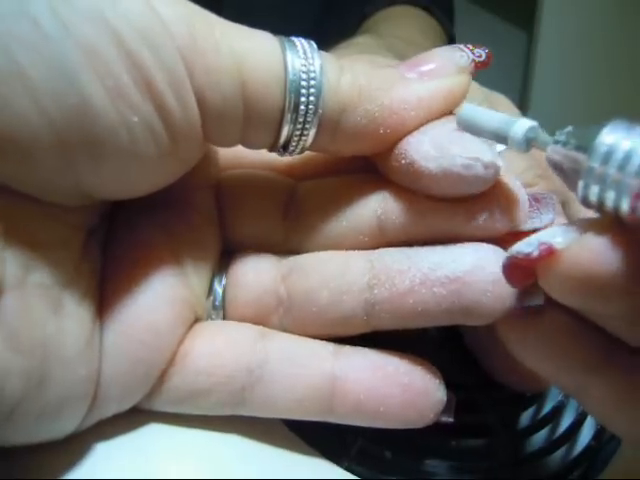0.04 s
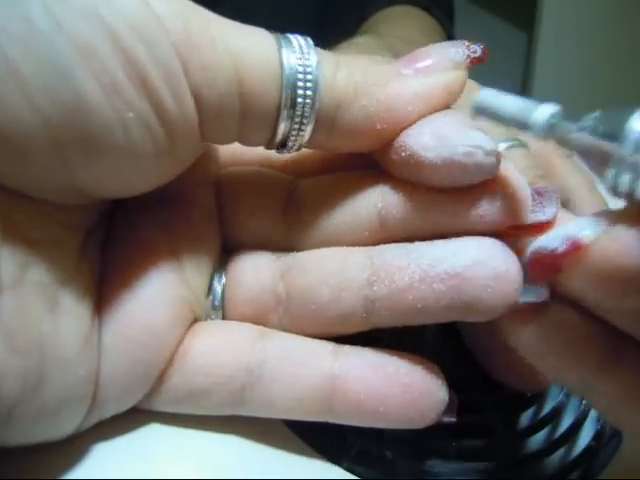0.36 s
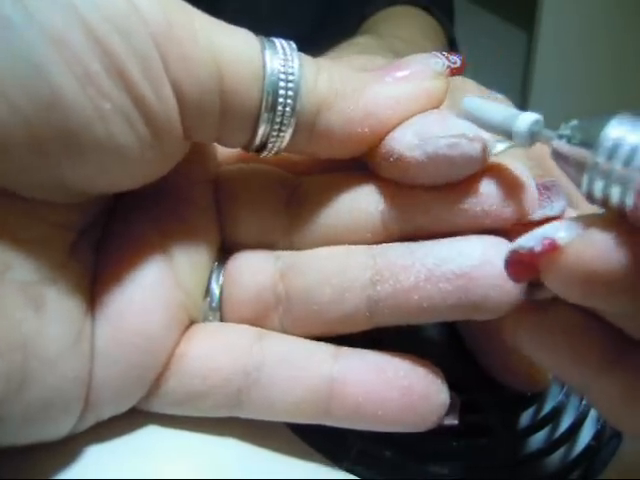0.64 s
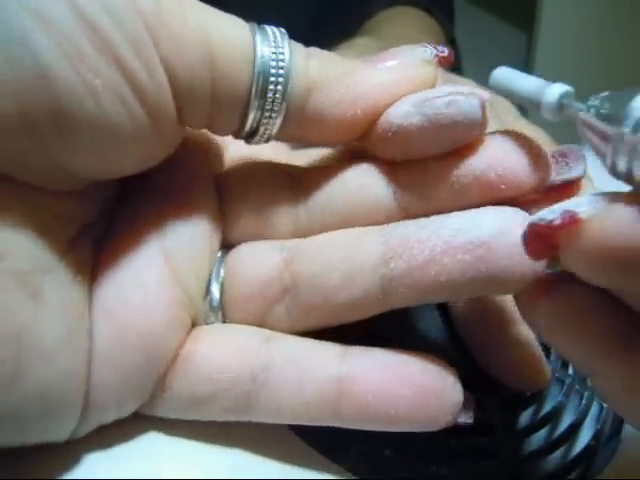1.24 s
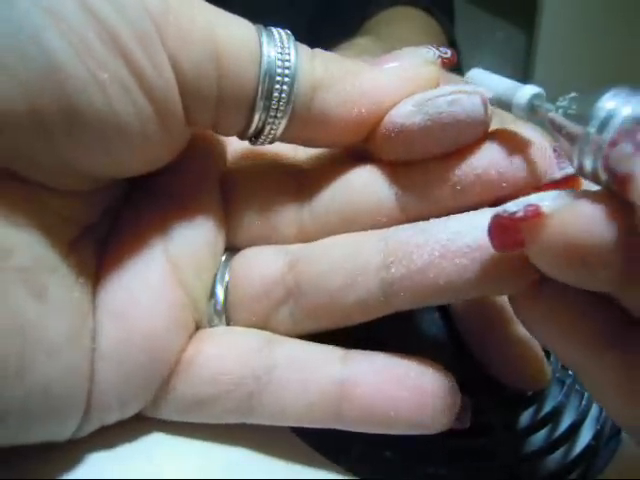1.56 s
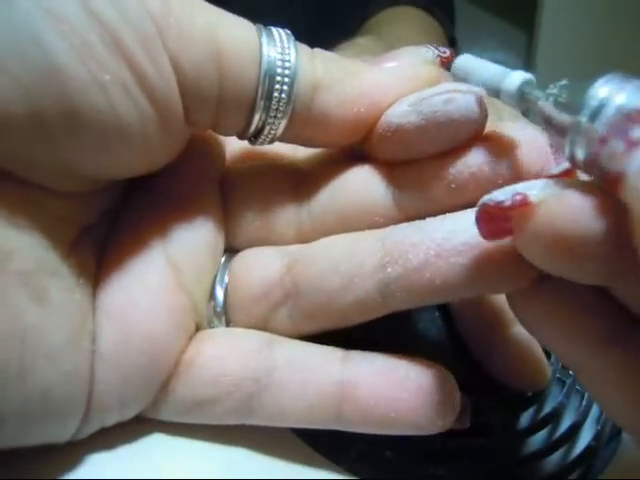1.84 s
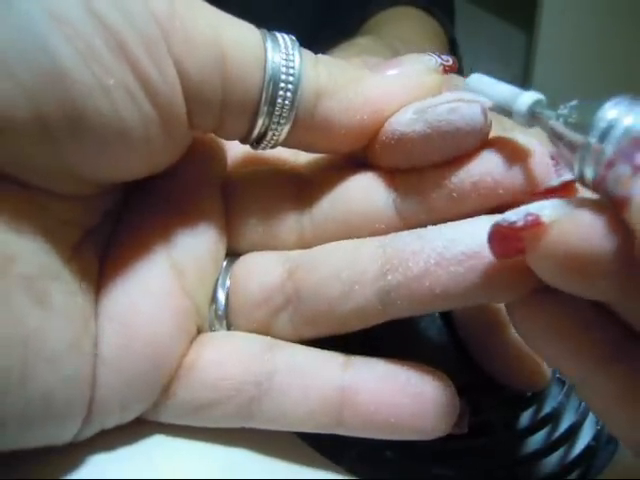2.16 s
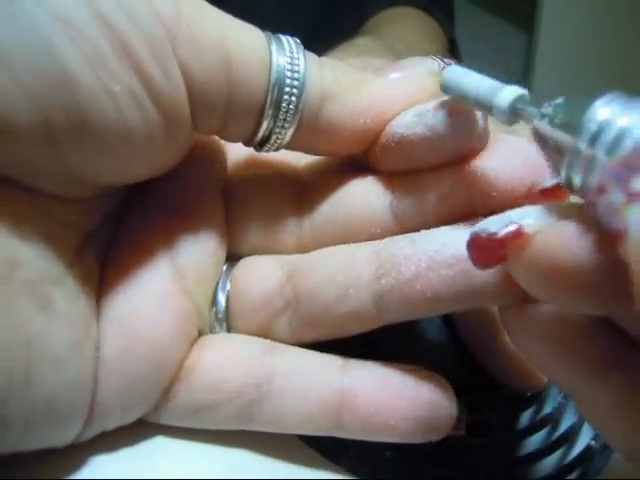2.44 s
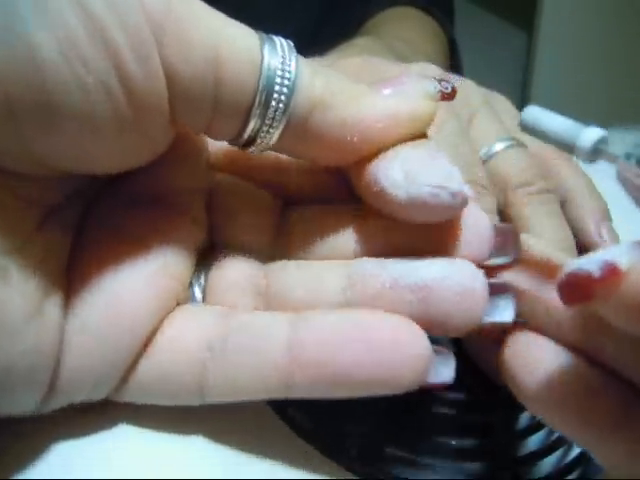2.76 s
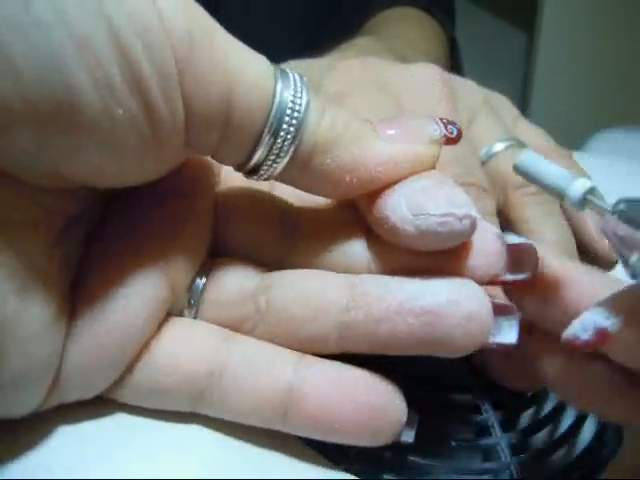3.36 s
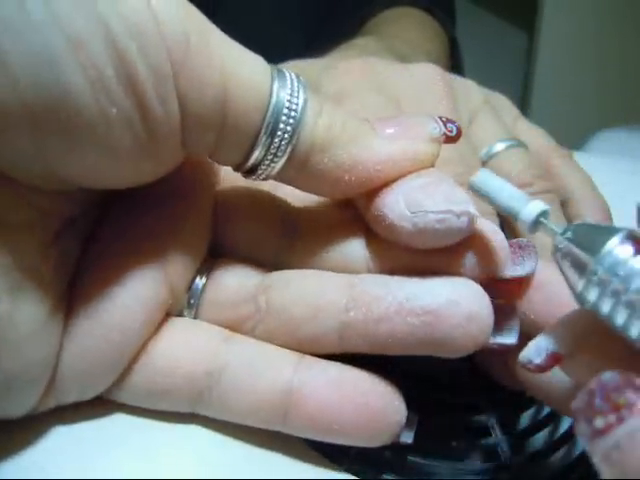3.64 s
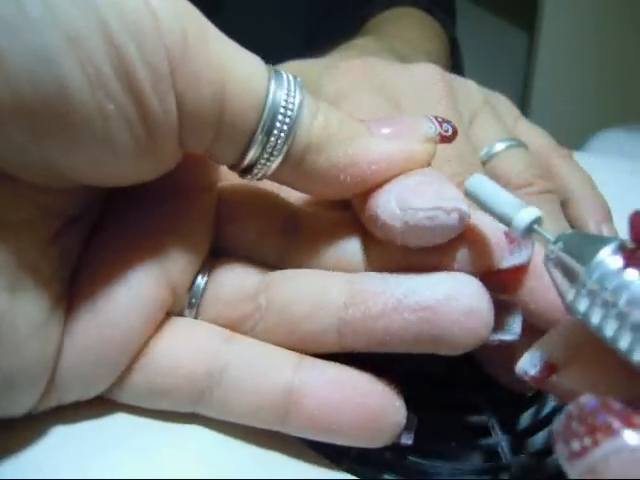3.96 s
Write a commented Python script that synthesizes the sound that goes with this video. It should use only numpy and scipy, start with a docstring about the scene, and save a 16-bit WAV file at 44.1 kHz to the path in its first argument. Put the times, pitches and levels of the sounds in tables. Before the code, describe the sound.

An electric nail file grinds a fingernail in four short strokes over a humming fan.

```python
"""Four short, rasping strokes of an electric nail file on a fingernail, close by, over a humming fan.
The bit bites once or twice a turn and drags the motor down; lifted off, the motor whirs back up to speed.
The dust extractor fan runs under the hands and grows louder as they move off it.
The camera's low sample rate mirrors the treble upwards."""
import sys
import numpy as np
from scipy.fft import rfft, irfft, next_fast_len
from scipy.io import wavfile
from scipy.ndimage import map_coordinates

SR = 44100
rng = np.random.default_rng(int(sys.argv[2]) if len(sys.argv) > 2 else 0)


def wrap_up_sound(samples):
    """Save the sound to the file named by the first command line argument, as 16-bit audio."""
    columns = np.atleast_2d(samples).T
    # keep every value between -1 and 1, then stretch to whole-number steps
    tamed = np.clip(columns, -1, 1)
    steps = np.round(tamed * 32767).astype(np.int16)
    wavfile.write(sys.argv[1], SR, steps)


N = 176400

FREE_SHAFT_HZ = 124.4
# one table per stroke (time [s], shaft speed [Hz], relative bite [dB], scrape [dB], knock [dB])
NAIL_STROKES = ([(0, 115.5, -22.5, -26, -23), (0.04, 113.7, -22.5, -25, -27),
                (0.1, 109.2, -19.5, -25.5, -31), (0.16, 104.6, -26, -31, -31),
                (0.21, 102.2, -21.5, -29.5, -30), (0.28, 98.7, -26, -32, -29),
                (0.36, 89.9, -24, -29.5, -31), (0.415, 88.25, -27, -33, -27)], [(0.64, 120, -45, -39, -23),
                (0.7, 119.6, -30, -27.5, -33), (0.77, 117.9, -26.5, -26.5, -44),
                (0.85, 107.9, -23, -27, -31), (0.89, 104.4, -24, -28, -31), (0.94, 98.3, -29, -23, -25),
                (0.98, 94.8, -22.5, -33, -26), (1.03, 92.1, -30, -32, -22.5),
                (1.07, 93.75, -22.5, -35, -34)], [(1.53, 124, -38, -31.5, -24),
                (1.59, 120.8, -29, -29.5, -27), (1.63, 118.7, -19.5, -26.5, -32),
                (1.67, 110.7, -24, -24.5, -19), (1.715, 102.3, -43, -26.5, -17.5),
                (1.77, 91.8, -40, -28, -22.5), (1.82, 91.3, -35, -28, -26), (1.88, 87.8, -33, -26.5, -49),
                (1.975, 91.6, -30, -30.5, -47)], [(2.205, 120.2, -34, -28, -27), (2.24, 116, -21, -29, -38),
                (2.275, 113.9, -16, -28.5, -34), (2.31, 107.9, -25, -26.5, -34),
                (2.36, 98.6, -24, -29.5, -24), (2.42, 87.8, -29, -28.5, -29), (2.46, 81.22, -32, -30, -26),
                (2.5, 83, -22, -30.5, -26), (2.545, 86.8, -27, -31, -49)])
# grit on nail (frequency [Hz], relative level [dB])
SCRAPE_SPECTRUM = [(500, -17), (1500, -7), (2300, 2), (3000, -7), (4000, -2.5), (5200, -1.5), (6500, 3.5),
                   (7300, 3), (8100, 8.5), (9300, 2), (10500, 1.5), (12000, -6)]


def grinding(turns, shaft_hz):
    """The bit's high spot bites and knocks the nail each turn, then rebounds; grit scrapes and sings."""
    # bite and knocked nail (frequency [Hz], relative level [dB])
    bite_spectrum = [(1000, -15), (3000, -25.5), (6000, -11), (7300, -14), (8100, 0), (8700, 4), (9300, -2),
                     (9900, 3), (10600, -5.5), (12000, -30)]
    nail_spectrum = [(400, -10), (1000, -21), (1500, -7), (1950, -3.5), (2300, 3), (2850, -7.5), (3700, -4),
                     (6000, -13), (10000, -4)]
    hard_bite_db, rebound_lag_turns = -20, .42
    sing_order, sing_peak_hz, sing_range_hz = 41.7, 105, 12
    bite_gain, scrape_gain, knock_gain = contact()
    bites = blows(turns, shaft_hz, decay_s=.0006, scatter_db=1.2)
    rebounds = blows(turns - rebound_lag_turns, shaft_hz, decay_s=.0006, scatter_db=1.2)
    rebound_gain = amp(-7) * np.minimum(bite_gain / amp(hard_bite_db), 1) ** .8
    grit = unit(bursts(turns, shaft_hz, decay_s=.027) * amp(1.7 * wobble(1500)))
    sing = unit(low_pass(noise(), hz=170, order=2) * np.sin(2 * np.pi * sing_order * turns))
    sing *= np.exp(-((shaft_hz - sing_peak_hz) / sing_range_hz) ** 2 / 2)
    knocks = blows(turns, shaft_hz, decay_s=.0009, scatter_db=1.8)
    return (amp(-2) * coloured(bite_gain * (bites + rebound_gain * rebounds), bite_spectrum)
            + amp(3) * coloured(scrape_gain * grit, SCRAPE_SPECTRUM)
            + amp(-10) * scrape_gain * sing
            + amp(-1) * coloured(knock_gain * knocks, nail_spectrum))


def contact():
    """Gains of bite, scrape and knock while the bit is on the nail."""
    press_s, lift_s = .0052, .024
    t, gains = clock(), np.zeros((3, N))
    for stroke in NAIL_STROKES:
        times_s, _, *levels_db = np.transpose(stroke)
        press = np.clip(1 + (t - times_s[0]) / press_s, 0, 1)
        lift = np.clip(1 - (t - times_s[-1]) / lift_s, 0, 1)
        gains += press * lift * amp([np.interp(t, times_s, db) for db in levels_db])
    return gains


def blows(turns, shaft_hz, decay_s, scatter_db):
    """One blow of random strength per turn: click and gritty tail at equal power."""
    count = np.floor(turns).astype(int)
    clicks = unit(np.diff(count, prepend=count[0]).astype(float))
    strengths = amp(scatter_db * np.clip(rng.standard_normal(1000), -2, 2))
    return unit(strengths[count] * (clicks + bursts(turns, shaft_hz, decay_s)))


def bursts(turns, shaft_hz, decay_s):
    """One burst of grit noise per turn."""
    age_s = (turns % 1) / shaft_hz
    return unit(noise() * np.exp(-age_s / decay_s))


def catches(decay_s):
    """Single harder ticks where the bit catches the nail's edge."""
    # ticks (time [s], level [dB])
    ticks = [(.645, -10), (0.662, -9), (1.5358, -10.5), (1.7699, -21), (2.4113, -12), (2.4217, -11)]
    t = clock()
    envelope = sum(amp(db) * (t >= s) * np.exp(-np.abs(t - s) / decay_s) for s, db in ticks)
    return coloured(envelope * noise(), SCRAPE_SPECTRUM)


def shaft_speed(spin_up_s):
    """Shaft speed in Hz: dragged down by the nail, recovering after each stroke."""
    t, shaft_hz = clock(), np.full(N, FREE_SHAFT_HZ)
    for stroke in NAIL_STROKES:
        times_s, hz = np.transpose(stroke)[:2]
        lifted_s = np.maximum(t - times_s[-1], 0)
        recovery_hz = FREE_SHAFT_HZ + (hz[-1] - FREE_SHAFT_HZ) * np.exp(-lifted_s / spin_up_s)
        stroke_hz = np.where(t < times_s[-1], np.interp(t, times_s, hz), recovery_hz)
        shaft_hz = np.where(t < times_s[0], shaft_hz, stroke_hz)
    return shaft_hz


def motor(turns, shaft_hz):
    """Brushes run over the same rough track inside the housing, hissing in two surges a turn."""
    # whir as the handpiece is moved about (time [s], level at free speed [dB])
    whir_levels = [(0, -35), (.55, -30), (1.15, -30), (1.5, -25), (2.05, -29), (2.65, -31.5), (2.9, -27),
                   (3.25, -25.5), (3.45, -25), (4, -24.5)]
    # housing response (frequency [Hz], relative level [dB])
    housing_spectrum = [(300, -19.5), (900, 0.5), (1500, 2), (2300, 0.5), (2700, -1.5), (3200, -0.5),
                        (4300, -5.5), (5200, -2), (6000, 3.5), (7000, 0.5), (8300, 4), (9200, 2.5),
                        (10100, 8.5), (10700, 1)]
    db_per_octave = 9
    harmonics = np.zeros(2049, complex)
    harmonics[1:90] = np.exp(2j * np.pi * rng.random(89))
    track = irfft(harmonics)
    buzz = unit(np.interp(turns % 1, np.arange(len(track)) / len(track), track))
    surge_db = 4 * np.cos(2 * np.pi * 2 * turns) + .64 * np.cos(2 * np.pi * turns) + .27 * wobble(200)
    hiss = amp(2.5) * noise()
    whir = unit(coloured(amp(surge_db) * (buzz + hiss), housing_spectrum))
    return whir * amp(curve(whir_levels) + db_per_octave * np.log2(shaft_hz / FREE_SHAFT_HZ))


def fan():
    """Extractor fan: air rush fluttering with the rotor, blade tones and mains hum."""
    # air rush (time [s], relative level [dB])
    air_levels = [(0.0, -33), (0.38, -35.5), (0.93, -32.5), (1.02, -34.5), (1.69, -32.5), (2.04, -36),
                  (2.19, -33.5), (2.58, -35.5), (3.69, -27), (4.0, -27)]
    # air rush (frequency [Hz], relative level [dB])
    air_spectrum = [(20, -48), (55, -21), (100, -6.5), (170, -3), (280, 0.5), (350, -2), (460, 2),
                    (540, -5), (660, -10), (850, -3), (1000, -3), (1200, -9.5), (2000, -10), (4000, -16.5),
                    (10000, -15.5)]
    # rotor (time [s], speed [turns/s])
    rotor_speeds = [(0, 20.06), (3.3, 20.04), (3.7, 20.14), (4, 20.3)]
    # blade tones (multiple of rotor speed, level before swell [dB])
    blade_tones = [(2, -62.5), (7, -58), (8, -52.5), (11, -60.5), (12, -42), (13, -48), (14, -36),
                   (15, -46), (16, -47), (28, -44.5), (29, -45), (31, -77), (34, -51), (39, -51),
                   (42, -49.5)]
    # blade tone swell (time [s], level before scaling [dB])
    blade_swell = [(0.0, -36.5), (0.5, -35), (1.11, -37), (1.5, -31.5), (2.61, -39.5), (2.93, -30),
                   (3.44, -33), (3.65, -27), (4.0, -35.5)]
    # motor hum (multiple of mains frequency, level [dB])
    hum_tones = [(2, -38.5), (4, -46), (8, -49.5)]
    mains_hz, blade_order, swell_scale = 50, 14, .66
    turns = np.cumsum(curve(rotor_speeds)) / SR
    flutter = 1 + .058 * (np.cos(2 * np.pi * turns) + np.cos(2 * np.pi * 2 * turns))
    air = amp(curve(air_levels) + 3) * unit(coloured(noise() * flutter, air_spectrum))
    # quarter-cycle sideband offsets: the blade tone wavers once a turn
    blades = sum(tone(k * turns + abs(k - blade_order) / 4, db) for k, db in blade_tones)
    hum = sum(tone(k * mains_hz * clock(), db) for k, db in hum_tones)
    swell_db = curve(blade_swell)
    return air + hum + blades * amp(swell_scale * (swell_db - swell_db.mean()))


def room():
    """Steady low rumble of the room."""
    # rumble (frequency [Hz], relative level [dB])
    rumble_spectrum = [(20, -16), (44, 0), (58, -4.5), (100, -1.5), (180, -1), (300, -8), (1000, -26),
                       (4000, -55)]
    return amp(-41) * unit(coloured(noise(), rumble_spectrum))


def amp(db):
    """Decibels to gain."""
    return 10 ** (np.asarray(db) / 20)


def unit(x):
    """x at rms 1."""
    return x / np.sqrt(np.mean(x ** 2) + 1e-20)


def clock():
    """Sample times in s."""
    return np.arange(N) / SR


def curve(rows):
    """(time [s], value) points joined by straight lines."""
    return np.interp(clock(), *np.transpose(rows))


def wobble(knots_per_s):
    """Smooth random curve."""
    knots = rng.standard_normal(int(N * knots_per_s / SR) + 4)
    return map_coordinates(knots, [clock() * knots_per_s])


def noise():
    """White noise."""
    return rng.standard_normal(N)


def tone(cycles, rms_db):
    """Sine with a slightly wandering level."""
    return np.sqrt(2) * amp(rms_db + .6 * wobble(5)) * np.sin(2 * np.pi * cycles)


def coloured(x, spectrum):
    """Minimum-phase filter of the given (Hz, dB) shape; white noise keeps its level."""
    size = 2 * next_fast_len(N // 2 + 4096)
    hz, db = np.transpose(spectrum)
    bins_hz = np.fft.rfftfreq(size, 1 / SR)
    gain = unit(amp(np.interp(np.log(bins_hz + 1), np.log(hz), db)))
    cepstrum = irfft(np.log(gain))
    cepstrum[1:size // 2] *= 2
    cepstrum[size // 2 + 1:] = 0
    return irfft(rfft(x, size) * np.exp(rfft(cepstrum)))[:N]


def low_pass(x, hz, order):
    """Zero-phase low-pass, Butterworth magnitude."""
    ratio = np.fft.rfftfreq(2 * N, 1 / SR) / hz
    return irfft(rfft(x, 2 * N) / np.sqrt(1 + ratio ** (2 * order)))[:N]


def scene():
    """One shaft drives both whir and grinding, over the fan and the room."""
    shaft_hz = shaft_speed(spin_up_s=.092) * (1 + .0007 * wobble(8))
    turns = np.cumsum(shaft_hz) / SR
    rumble = room()
    nail_file = motor(turns, shaft_hz) + grinding(turns, shaft_hz) + catches(decay_s=.001)
    return (nail_file + fan() + rumble)[None]


def record(dry):
    """The camera runs at half rate and holds each sample, which mirrors the treble upwards."""
    half_rate = low_pass(dry[0], hz=10640, order=20)[::2]
    held = np.repeat(half_rate, 2)[:N]
    return low_pass(held, hz=15480, order=300)[None]


dry = scene()
out = record(dry)
wrap_up_sound(out)
```